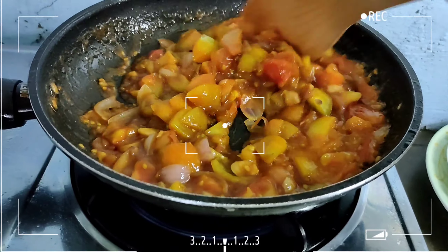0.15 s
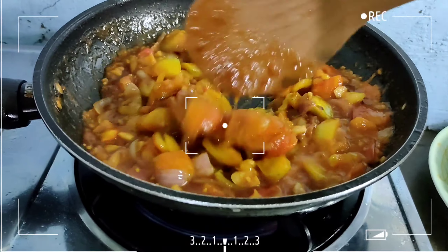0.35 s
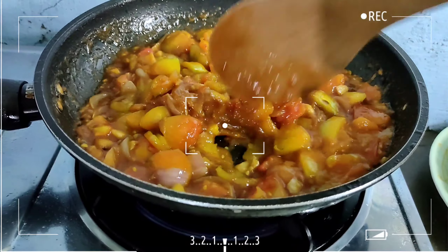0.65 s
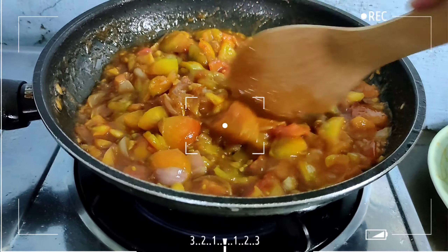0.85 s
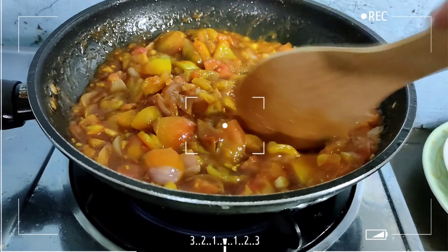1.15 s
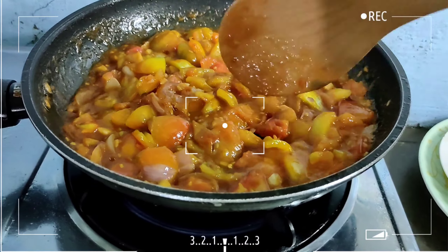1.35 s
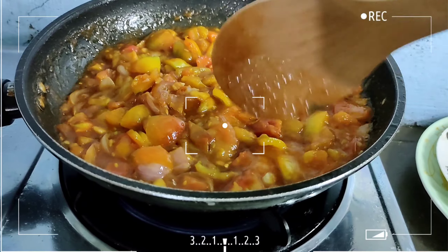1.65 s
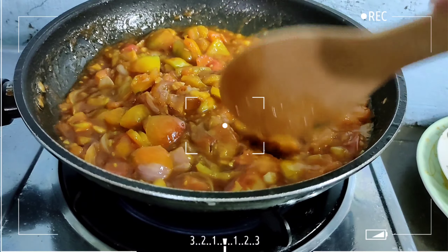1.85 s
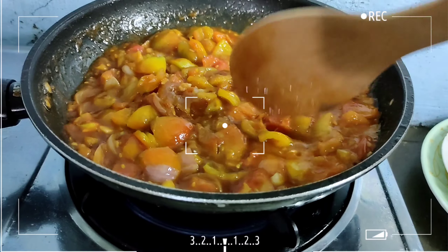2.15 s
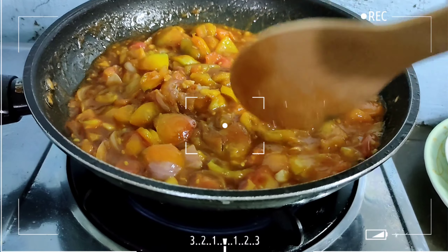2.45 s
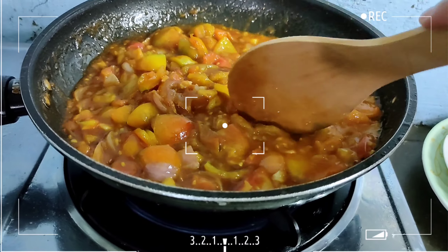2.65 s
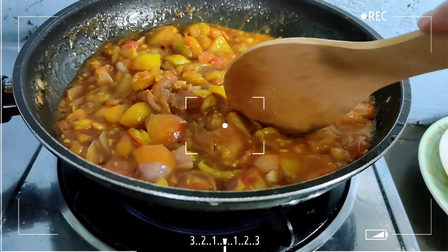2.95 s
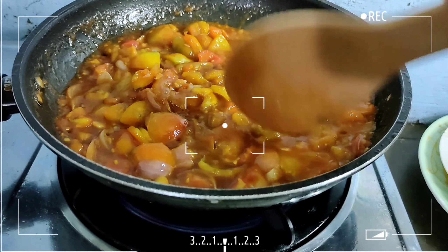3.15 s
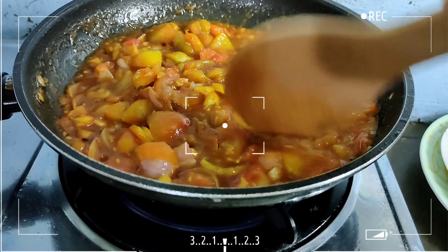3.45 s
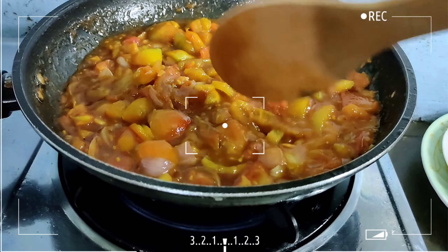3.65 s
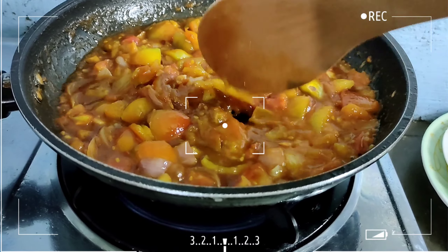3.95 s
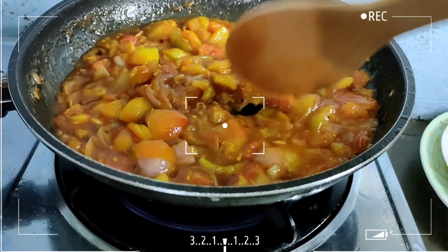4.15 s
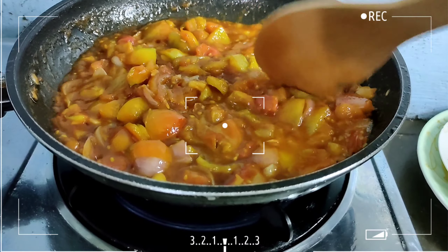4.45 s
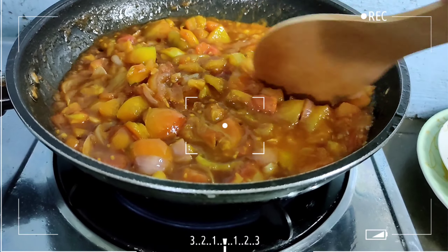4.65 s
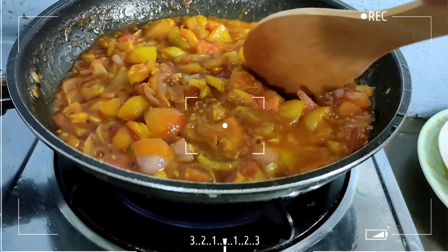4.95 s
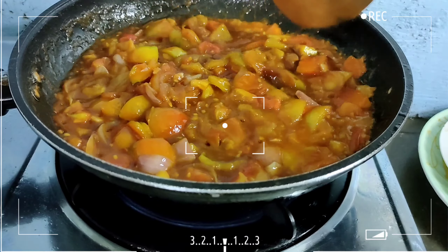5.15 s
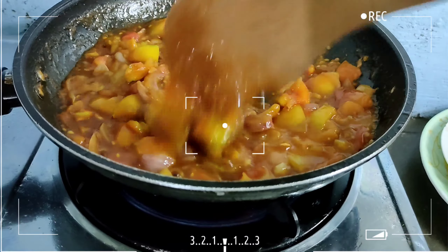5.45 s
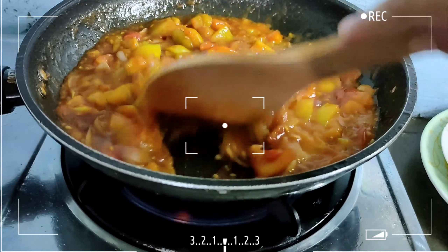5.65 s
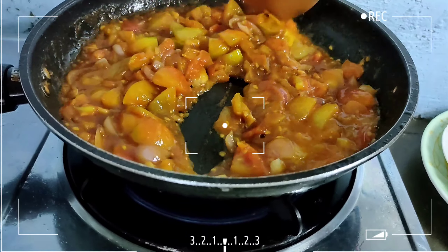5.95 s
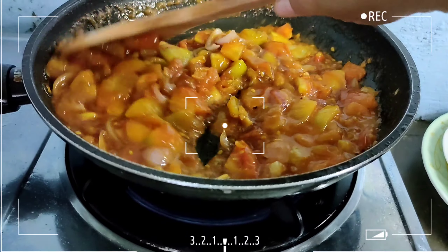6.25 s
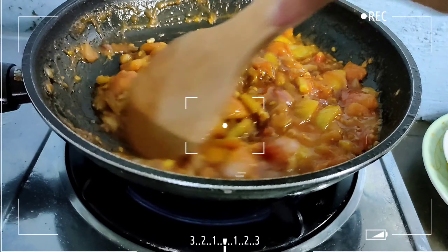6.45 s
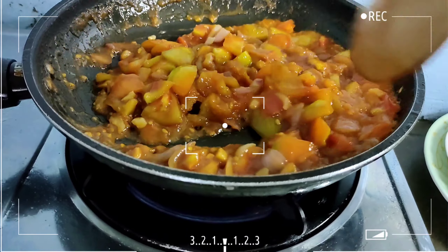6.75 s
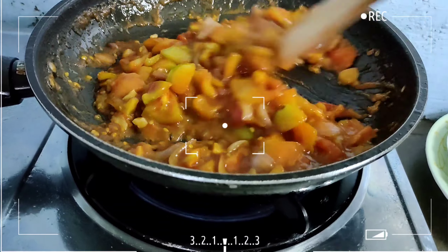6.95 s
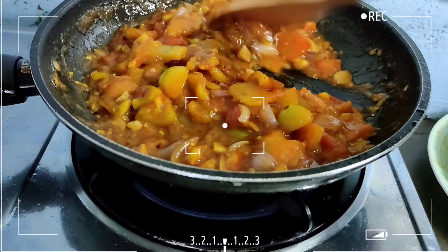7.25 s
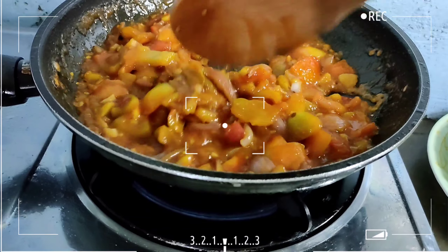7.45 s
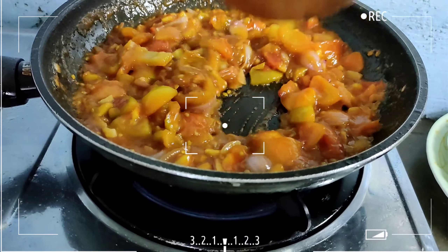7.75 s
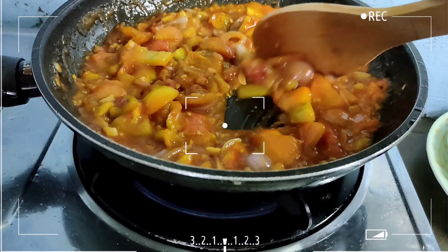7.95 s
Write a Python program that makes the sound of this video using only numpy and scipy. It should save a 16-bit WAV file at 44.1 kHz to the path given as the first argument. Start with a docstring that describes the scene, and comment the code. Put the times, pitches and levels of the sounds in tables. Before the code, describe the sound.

Close by in a small kitchen, thick sauce simmers in a frying pan with a quiet, steady sizzle, little plops and the odd sharp spit. Over it a wooden spoon gives a run of short, muted clacks, then stirs more quietly with wet squelching. A second run of knocks follows, then a few light scrapes, a quick rattle on the pan wall and a last dull knock.

```python
"""A wooden spoon stirs chunky sauce simmering in a nonstick frying pan in a small kitchen.
After a short scrape the spoon knocks about three times a second, the pan's ring damped by the food.
From 2 s it drags through the sauce, freeing squelches of bubbles; at 4 s the knocking returns.
From 6 s it scrapes bare metal, rattles against the wall and ends on a dull knock.
All along, bubbles plop and the hot rim sizzles and now and then spits."""
import sys
import numpy as np
from scipy import signal
from scipy.io import wavfile

SR = 44100
rng = np.random.default_rng(int(sys.argv[2]) if len(sys.argv) > 2 else 0)


def transcribe(u):
    """Save the signal u as a 16-bit wav file named by the first command-line argument.

    u: samples, shape (n,) or (channels, n), limited to [-1, 1]; the rate is SR.
    q: integer samples, one column per channel.
    """
    v = np.clip(np.atleast_2d(u).T, -1, 1)
    q = np.round(v * 32767).astype(np.int16)
    wavfile.write(sys.argv[1], SR, q)


N = 357651
TIME = np.arange(N) / SR


def knocks(scatter_db=1.0, contact_hz=3300):
    """Spoon on pan: blows cushioned by food are dull; wood on the wall wakes other modes."""
    # spoon blows: t/s, strength/dB, hardness as extra treble/dB, place (0 pan floor .. 1 wall)
    blows = [(0.6014, -6, -3, 0.05), (0.944, 2, -2.5, 0.028), (1.2576, 0, -4, 0.091),
             (1.5624, 3.5, -2, 0.084), (1.8452, -7, -5.5, 0.08), (2.1397, -11, -10, 0.27),
             (2.721, -35, 12, 0.5), (3.614, -25, 0, 0), (4.1404, -7.5, -15, 0.17), (4.4571, -2.5, 1.5, 0),
             (4.764, -6, -0.5, 0.11), (4.958, -30.5, 4, 0.28), (5.0382, -4, -1, 0), (5.3275, -12, 5, 0.78),
             (6.0722, -9, 4.5, 0.65), (6.218, -32.5, -8, 0.42), (6.4, -30.5, 8, 0.35),
             (6.626, -36, -6, 0.1), (6.9255, -14, -0.5, 0.78), (6.936, -13.5, -7, 0.65),
             (6.958, -18, -5, 0.86), (6.9847, -18.5, 11.5, 0.3), (6.997, -18, 7, 0.057),
             (7.385, -9, -9, 0.4), (7.689, -29, 2, 0.13), (8.017, -10.5, -25, 0.0087)]
    times, strength_db, treble_db, place = np.transpose(blows)
    # light and cushioned blows stay longer in contact and so carry more bass
    bass_db = -2 - 0.35 * strength_db - 0.17 * treble_db
    # tone of a blow: f/Hz, share of the bass gain, share of the treble gain
    shelves = [(400, 1, 0), (480, .4, 0), (700, 0, 0), (1050, 0, 0), (1600, 0, 1)]

    def force(hz, colour_db=0):
        low, high = at_hz(shelves, hz)
        return clicks(times, from_db(strength_db + low * bass_db + high * treble_db + colour_db))

    def mode_force(hz, wall_db):
        return force(hz, place * wall_db + scatter_db * rng.standard_normal(len(times)))

    strike = pan_body(mode_force) + spoon(force)
    # wet wood yields a little, which rounds the edge of every blow
    return butter(strike, contact_hz, "low", order=3) + diffuse_ring(force)


def pan_body(drive, lag_turns=0.3):
    """The pan rings under drive(hz, wall_db); each mode lags the last, so a blow takes a few ms to build."""
    # modes of the loaded pan: f/Hz, level/dB, t60/s, left minus right/dB, change on the wall/dB
    modes = [(335.8, -32.5, 0.21, -6.5, 4.5), (379.8, -21.5, 0.16, -2.5, -10.5), (400, -26, 0.031, -11, -3),
             (482.8, -26, 0.16, -1.5, -7), (540, -34, 0.19, -2, 19.5), (617, -48.5, 0.15, 4, 17.5),
             (651.8, -20, 0.11, 1, -4), (711, -18.5, 0.042, 6.5, -18.5), (752.3, -23.5, 0.11, -3.5, -5.5),
             (816, -31, 0.045, -12, 24), (867, -33.5, 0.074, 8, -31), (897, -28.5, 0.19, -2.5, -14),
             (982, -21.5, 0.061, 1.5, 1.5), (1051, -21, 0.12, 2, -29), (1135, -26.5, 0.075, -9, -15),
             (1183, -38, 0.16, -9, -10), (1328, -33.5, 0.16, 4.5, -22), (1464, -29, 0.056, 13, -33),
             (1484, -25, 0.064, -1.5, -24), (1735, -29, 0.12, -6, -19), (1718, -32.5, 0.12, 5, -25),
             (1800, -26.5, 0.1, 3, -8), (1983, -28, 0.068, -3.5, 8), (2184, -35.5, 0.098, 12.5, 4.5),
             (2340, -39, 0.053, 12, -5), (2530, -39.5, 0.066, -12, 5), (2764, -36, 0.093, 4, -5),
             (2840, -53, 0.09, -2, 21), (3146, -48.5, 0.088, 9, 16), (3560, -53, 0.045, -2, 28)]
    out = 0
    for k, (hz, db, t60, pan_db, wall_db) in enumerate(modes):
        tone = ring(drive(hz, wall_db), hz, t60, phase=-2 * np.pi * lag_turns * k)
        out = out + from_db(db) * panned(pan_db) * tone
    return out


def spoon(force):
    """The wood's own tock: a few heavily damped modes, gone well before the pan's ring."""
    # modes of the wooden spoon: f/Hz, level/dB, t60/s
    modes = [(860, -17, 0.0051), (1100, -26, 0.016), (1687, -43, 0.017), (2680, -38, 0.026)]
    return sum((-1) ** k * from_db(db) * ring(force(hz), hz, t60) for k, (hz, db, t60) in enumerate(modes))


def diffuse_ring(force):
    """The tail of a knock: countless small modes and the room, each band dying at its own rate."""
    # dense small modes of spoon, pan and hob: f/Hz, spectral level/dB, t60/s
    clatter = [(300, -18.5, 0.14), (700, -14, 0.24), (1380, -17, 0.13), (2700, -30, 0.11),
               (3660, -35.5, 0.17), (5070, -57, 0.18), (12000, -70, 0.03)]
    # the kitchen's reverb: f/Hz, spectral level/dB, t60/s
    kitchen = [(300, -27, 0.3), (700, -20, 0.28), (1300, -26, 0.28), (2700, -37, 0.35), (3700, -44, 0.3),
               (6000, -85, .2)]
    out = 0
    for hz, band in bands(rng.standard_normal((2, 2, N))):
        blow_power, power = force(hz) ** 2 + 1e-18, 0
        for level_db, t60 in (at_hz(clatter, hz), at_hz(kitchen, hz)):
            decay = from_db(-60 / (t60 * SR)) ** 2
            power = power + signal.lfilter([from_db(level_db) ** 2], [1, -decay], blow_power)
        out = out + band * np.sqrt(power)
    return out


def scrapes(slips_per_s=83, jitter=0.37, spread_db=2.5, contact_hz=1100):
    """Wood sticks and slips unevenly in swelling, fading runs that ring the pan; sauce dulls them."""
    # the spoon's edge drags over bare pan: t/s, length/s, level/dB
    drags = [(0.212, 0.059, -49), (6.32, 0.073, -53.5), (6.41, 0.14, -49.5), (6.54, 0.081, -48.5),
             (6.687, 0.053, -57.5), (7.71, 0.05, -48)]
    gaps = np.exp(jitter * rng.standard_normal(4096)) / slips_per_s
    heights = from_db(spread_db * rng.standard_normal(len(gaps)))
    times = np.cumsum(gaps)
    slips = clicks(times, heights * (times < TIME[-1]))
    pressure = 0
    for start, length, db in drags:
        progress = np.clip((TIME - start) / length, 0, 1)
        pressure = pressure + from_db(db) * np.sqrt(np.abs(np.sin(np.pi * progress)))
    rasp = butter(pan_body(lambda hz, wall_db: slips), contact_hz, "low")
    return pressure * rms_one(rasp)


def stirring(stir_db, trim_db=-2.5, clump_db=1.0):
    """Chunks slipping and bumping under the spoon keep the pan faintly ringing."""
    taps = grains(per_s=550, spread_db=2.1) * from_db(clump_db * drift(30))
    return from_db(stir_db + trim_db) * rms_one(pan_body(lambda hz, wall_db: taps))


def squelches(stir_db, run_bubbles=6, run_s=0.025, plops_per_s=40, spread_db=3.0):
    """Sauce closing behind the spoon frees a quick run of bubbles; single ones plop wherever it moves."""
    # wet squelches under the spoon: t/s, bubble level/dB
    runs = [(2.27, -39), (2.606, -42), (2.649, -37.5), (2.72, -41), (3.174, -38), (3.312, -39),
            (3.879, -45), (5.529, -42), (5.668, -40), (6.848, -43)]
    low_hz, high_hz = 550, 2800
    cycles, rise = 17, 0.15  # a bubble rings this many cycles, its pitch rising by this share
    starts, run_db = np.repeat(runs, run_bubbles, axis=0).T
    plop_times = rng.uniform(0, N / SR, int(plops_per_s * N / SR))
    times = np.r_[starts + run_s * rng.random(len(starts)) ** 2, plop_times]
    levels_db = np.r_[run_db, np.interp(plop_times, TIME, stir_db)]
    age, out = TIME[:SR // 20], np.zeros((2, N + SR))
    for start, db, (pitch, size, side) in zip(times, levels_db, rng.uniform(-1.03, 1, (len(times), 3))):
        hz = np.sqrt(low_hz * high_hz) * (high_hz / low_hz) ** (pitch / 2)
        life = age * hz / cycles
        bubble = np.sin(2 * np.pi * hz * age * (1 + rise * life / 2)) * from_db(-60 * life)
        onset = int(start * SR)
        out[:, onset:onset + len(age)] += from_db(db + spread_db * size) * panned(spread_db * side) * bubble
    return butter(out[:, :N], [low_hz, high_hz], "band")


def sauce_activity(resting_db=-54.5):
    """Levels in dB of moving sauce and of sizzle: each stroke adds its power to the resting simmer."""
    # the spoon pushes through the sauce: t/s, length/s, stirring level/dB, sizzle level/dB
    strokes = [(0.134, 0.082, -65, -55.5), (1.115, 0.89, -52.5, -87), (2.288, 2.7, -51, -66),
               (3.513, 0.66, -50.5, -58), (4.516, 1.07, -49.5, -62.5), (5.577, 0.3, -58.5, -54),
               (6.113, 0.46, -52.5, -72), (7.657, 0.13, -57, -56)]
    stir = sizzle = from_db(resting_db) ** 2
    for start, length, stir_db, flare_db in strokes:
        stir = stir + from_db(stir_db) ** 2 * swell(start, length, attack_s=0.055, release_s=0.14)
        # sauce spread on hot metal starts to fry, then dries off
        sizzle = sizzle + from_db(flare_db) ** 2 * swell(start, length, attack_s=0.2, release_s=0.49)
    return 10 * np.log10(stir), 10 * np.log10(sizzle)


def spits(trim_db=-17.0, snap_db=9.5, snap_s=0.00016, room_db=-22.0, room_s=0.021):
    """A droplet bursts with a sharp snap, boils off and echoes faintly; small ones crackle at random."""
    # droplets on hot metal: t/s, relative level/dB, boil-off time/s
    droplets = [(0.586, -27, 0.0028), (0.947, -19.5, 0.0046), (1.8118, -45, .003), (2.054, -37, .015),
                (2.242, -27, .002), (2.3660, -29, 0.0012), (2.4698, -27, 0.0027), (2.4895, -31, .003),
                (2.6398, -21.5, .002), (2.7768, -20, .004), (3.6366, -29, .004), (3.7589, -27, 0.0024),
                (4.0387, -29, .002), (4.1295, -26, .003), (4.2078, -26, .002), (4.2627, -27, .002),
                (4.337, -23, .003), (4.4687, -25.5, 0.0027), (4.7248, -31, .003), (5.447, -27, 0.0026),
                (5.6755, -29, 0.013), (5.6994, -32, 0.023), (6.704, -33, .004), (7.3714, -25, .003)]
    age, envelope = TIME[:SR // 5], np.zeros(N + SR)
    snap = from_db(snap_db) * np.exp(-age / snap_s)
    echo = from_db(room_db) * np.exp(-age / room_s)
    for start, db, boil_s in droplets:
        onset = int(start * SR)
        envelope[onset:onset + len(age)] += from_db(db) * (snap + np.exp(-age / boil_s) + echo)
    crackle = from_db(-54) * grains(per_s=31, spread_db=6.5)
    bursts = envelope[:N] * rng.standard_normal((2, N))
    return from_db(trim_db) * panned(-13) * butter(bursts + crackle, [7000, 11800], "band")


def simmer(stir_db, sizzle_db, level_db=-48.0, flicker_db=2.0, wet_share=0.15, frying_share=0.82):
    """A bed of tiny bursts: wet and low where the spoon moves the sauce, a fine fizz on the hot rim."""
    # colour of simmering and frying: f/Hz, left spectral level/dB, right spectral level/dB
    spectrum = [(256, -87, -90.5), (380, -86.5, -84.5), (700, -85, -87), (880, -83, -81.5),
                (1140, -90.5, -86.5), (2640, -89, -87), (3350, -90.5, -92), (4930, -100, -99),
                (6640, -111, -104), (8850, -100, -93.5), (9950, -101, -84), (13050, -111, -107.5),
                (15230, -112, -96.5)]
    bursts = np.array([[grains(per_s=9000, spread_db=3.0) for _ in range(2)] for _ in range(2)])
    stirred_db, frying_db = stir_db - np.median(stir_db), sizzle_db - np.median(sizzle_db)
    common_drift, out = drift(60), 0
    for hz, band in bands(bursts):
        fizz = at_hz([(1000, 0.086), (6000, 0.89)], hz)[0]  # the treble follows the frying
        activity_db = (1 - fizz) * wet_share * stirred_db + fizz * frying_share * frying_db
        wobble_db = flicker_db * (.5 * common_drift + 0.82 * drift(45))
        out = out + band * from_db(at_hz(spectrum, hz))[:, None] * from_db(activity_db + wobble_db)
    return from_db(level_db) * rms_one(out)


def rim_fizz(sizzle_db, trim_db=0.5, centre_hz=7700, width_hz=1250, pan_db=-25.0, flicker_db=2.0):
    """Water flashing to steam along the hot rim: uneven ticks gathered in one rounded treble band."""
    ticks = np.array([grains(per_s=5000, spread_db=2.0) for _ in range(2)])
    fizz = butter(ticks, [centre_hz - width_hz / 2, centre_hz + width_hz / 2], "band")
    return from_db(sizzle_db + trim_db + flicker_db * drift(90)) * rms_one(panned(pan_db) * fizz)


def bands(noises):
    """Yields (centre Hz, stereo band); neighbours use unrelated noise, and the bass is nearly mono."""
    # stereo image: f/Hz, left-right likeness (0..1)
    likeness = [(300, 0.94), (700, 0.77), (1100, 0.031), (2000, 0.13), (4000, 0.15), (15000, 0.022)]
    edges_hz = np.geomspace(170, 17000, 19)
    for k, (low, high) in enumerate(zip(edges_hz, edges_hz[1:])):
        hz = np.sqrt(low * high)
        alike = np.clip(at_hz(likeness, hz)[0], 0, 1)
        mid, side = butter(noises[k % 2], [low, high], "band", order=3)
        yield hz, np.sqrt(1 + alike) * mid + np.sqrt(1 - alike) * side * np.array([[1], [-1]])


def ring(x, hz, t60, phase=0):
    """A resonator: a unit click sets a sine of height 1 ringing."""
    r, w = from_db(-60 / (t60 * SR)), 2 * np.pi * hz / SR
    return signal.lfilter([np.sin(phase), r * np.sin(w - phase)], [1, -2 * r * np.cos(w), r * r], x + 1e-18)


def swell(start, length, attack_s, release_s):
    """Rises from 0 towards 1 while a stroke lasts and dies away after it."""
    rise = 1 - np.exp(-np.clip(TIME - start, 0, length) / attack_s)
    return rise * np.exp(-np.maximum(TIME - start - length, 0) / release_s)


def clicks(times, heights):
    """One-sample impulses at the given times."""
    out = np.zeros(N)
    np.add.at(out, np.clip(np.round(times * SR).astype(int), 0, N - 1), heights)
    return out


def grains(per_s, spread_db):
    """Random clicks, many small and a few large."""
    sizes = from_db(spread_db * np.minimum(rng.exponential(1, N), 5))
    return sizes * rng.choice([-1, 1], N) * (rng.random(N) < per_s / SR)


def drift(rate):
    """Smooth random modulation of RMS 1 that changes about rate times a second."""
    knots = rng.standard_normal(4096)
    return rms_one(np.interp(TIME * rate, np.arange(len(knots)), knots))


def at_hz(rows, hz):
    """Every column of a spectrum table at one frequency."""
    freqs, *columns = np.transpose(rows)
    return [np.interp(np.log(hz), np.log(freqs), column) for column in columns]


def panned(pan_db):
    """Left and right gains as a column; negative is to the right."""
    return from_db(np.array([[pan_db], [-pan_db]]) / 2)


def butter(x, hz, kind, order=2):
    return signal.sosfilt(signal.butter(order, hz, kind, fs=SR, output="sos"), x + 1e-18)


def from_db(db):
    return 10 ** (np.asarray(db) / 20)


def rms_one(x):
    return x / np.sqrt(np.mean(x ** 2) + 1e-20)


def scene(left_lag_s=0.0003):
    """Knocks and scrapes over the stirred, simmering sauce."""
    stir_db, sizzle_db = sauce_activity()
    utensil = knocks() + scrapes() + stirring(stir_db)
    left, right = utensil + squelches(stir_db) + simmer(stir_db, sizzle_db) + rim_fizz(sizzle_db) + spits()
    # the pan stands to the right, so its sound reaches the left later
    return np.array([np.interp(TIME - left_lag_s, TIME, left), right])


def record(dry, low_cut_hz=289, top_cut_hz=15500, leak_db=-17.0, leak_hz=110):
    """A steep low cut that lets a trace of bass through, and a steep top cut."""
    thin = signal.sosfilt(signal.cheby1(9, .1, low_cut_hz, "high", fs=SR, output="sos"), dry)
    bass = from_db(leak_db) * butter(dry, leak_hz, "low")
    return signal.sosfilt(signal.ellip(10, .2, 70, top_cut_hz, fs=SR, output="sos"), thin + bass)


dry = scene()
out = record(dry)
transcribe(out)
```